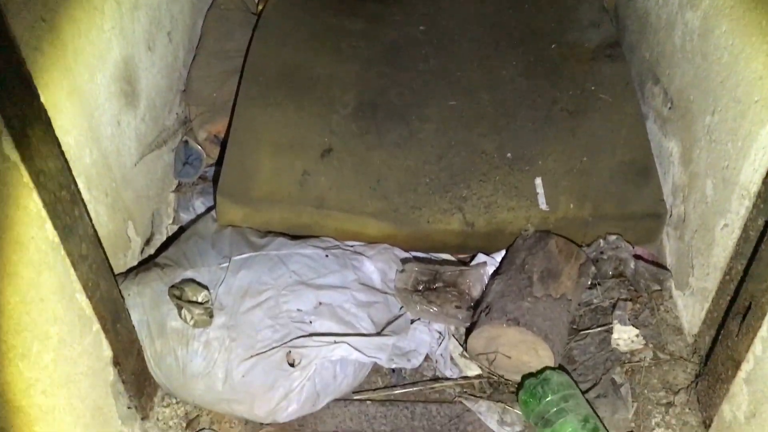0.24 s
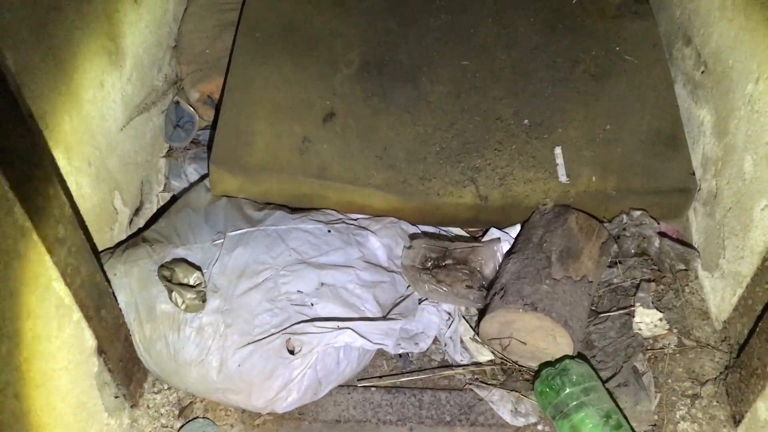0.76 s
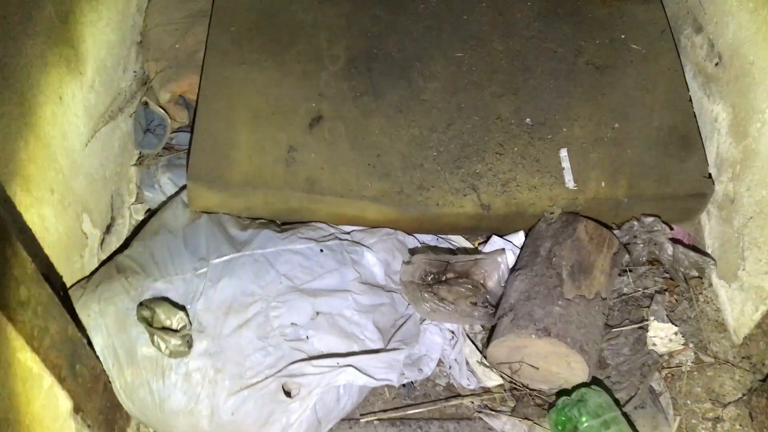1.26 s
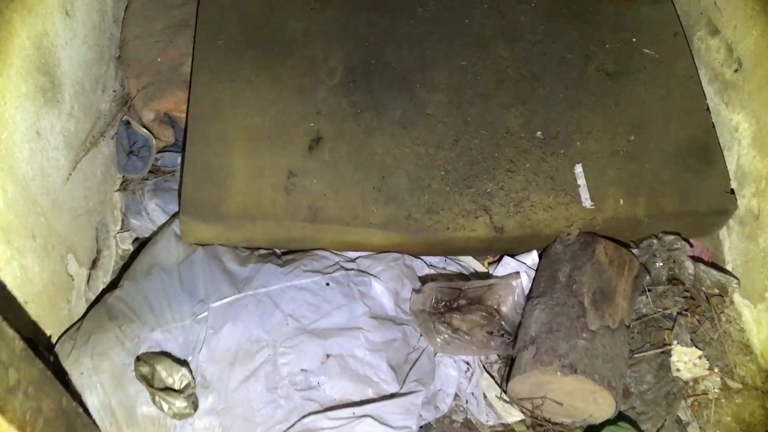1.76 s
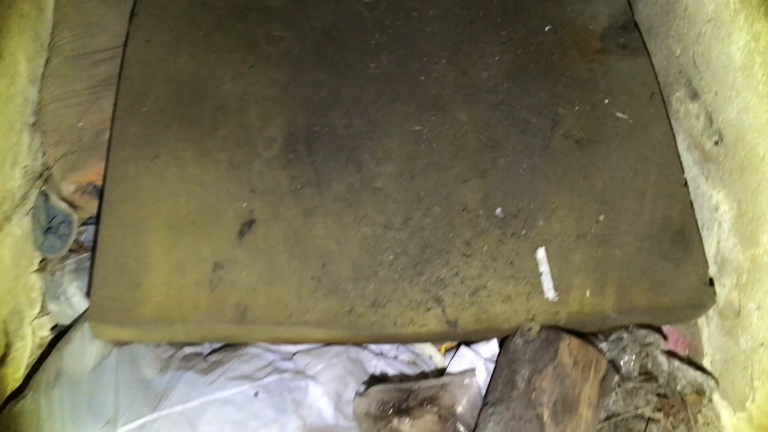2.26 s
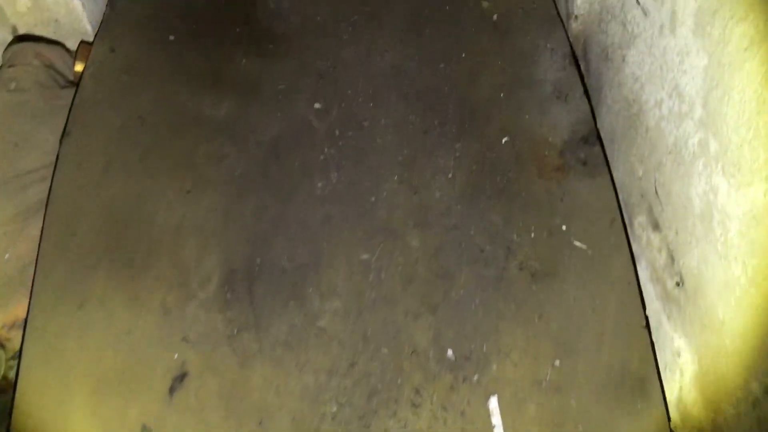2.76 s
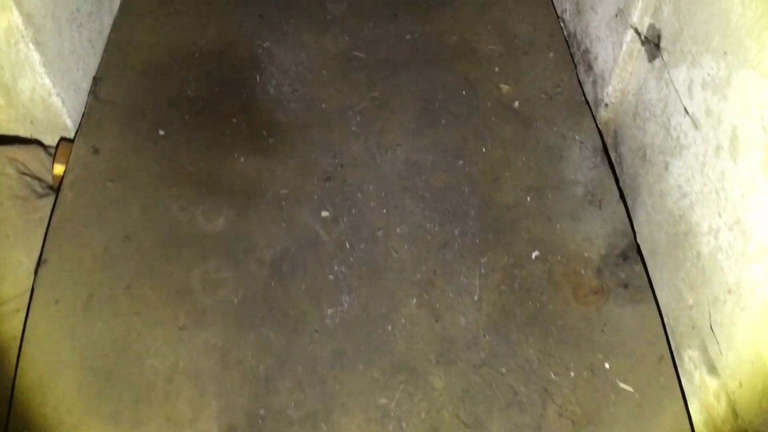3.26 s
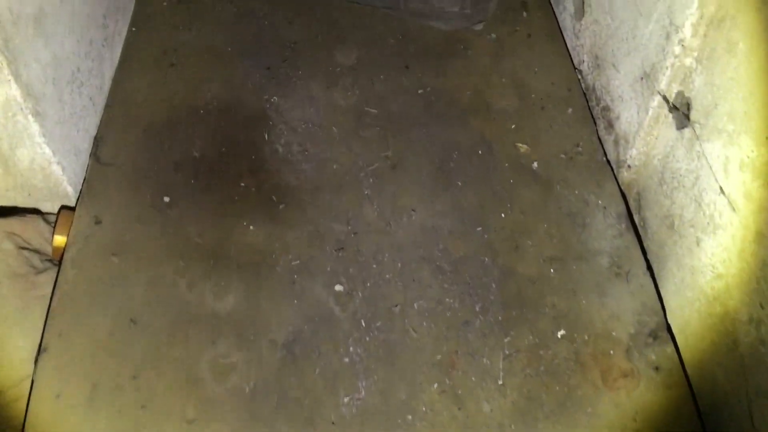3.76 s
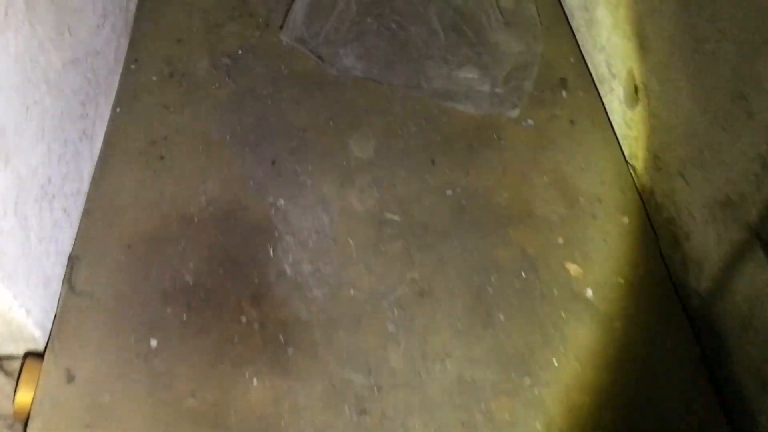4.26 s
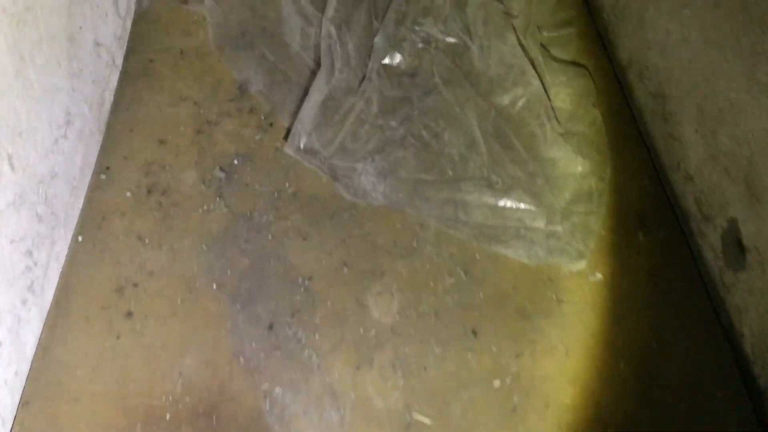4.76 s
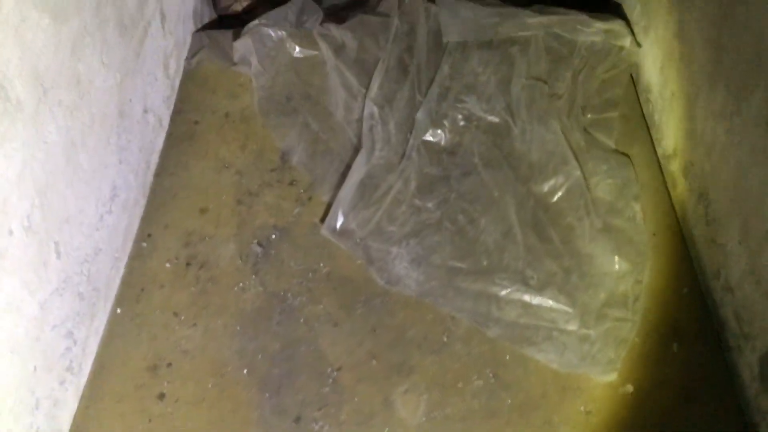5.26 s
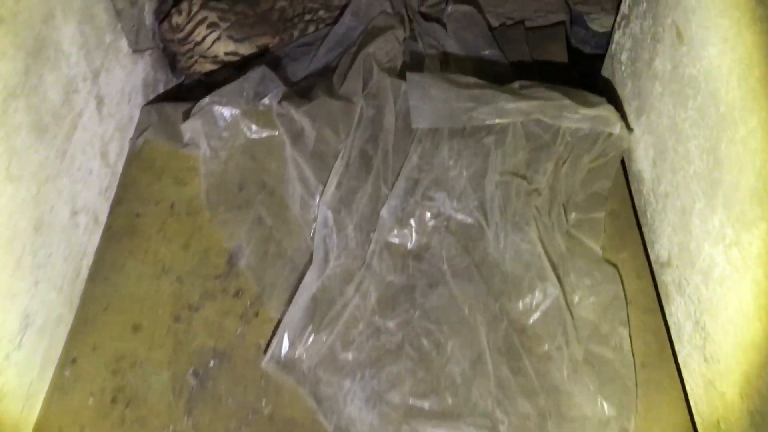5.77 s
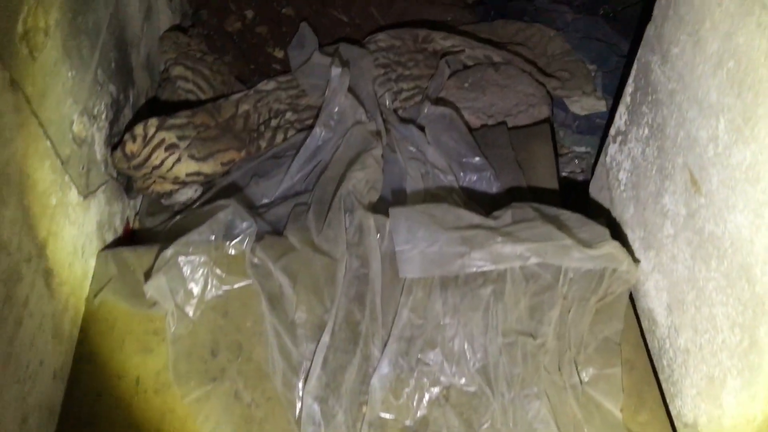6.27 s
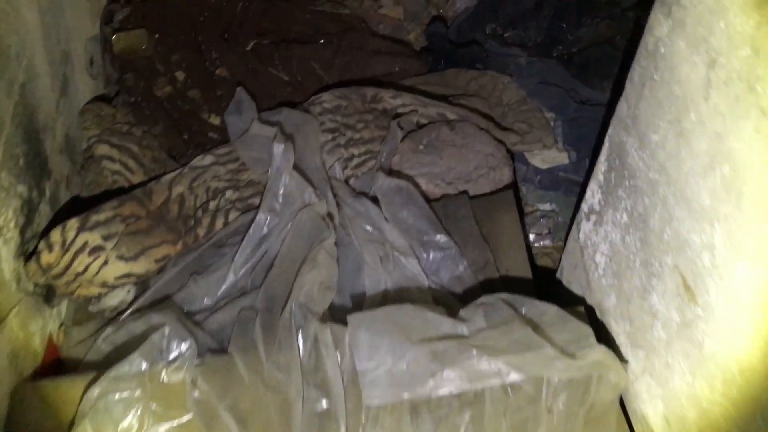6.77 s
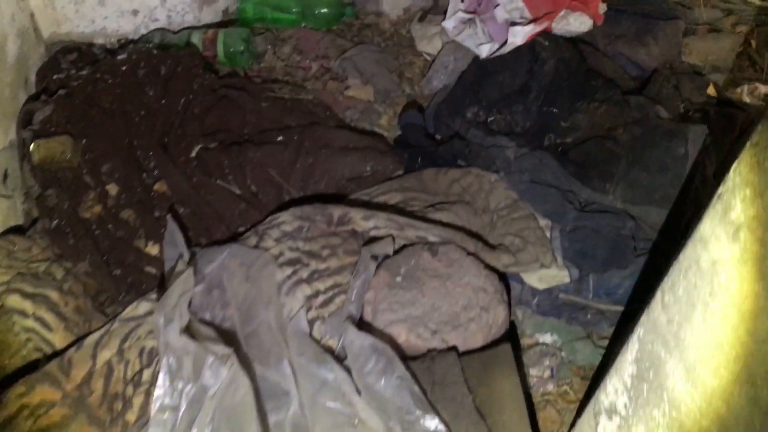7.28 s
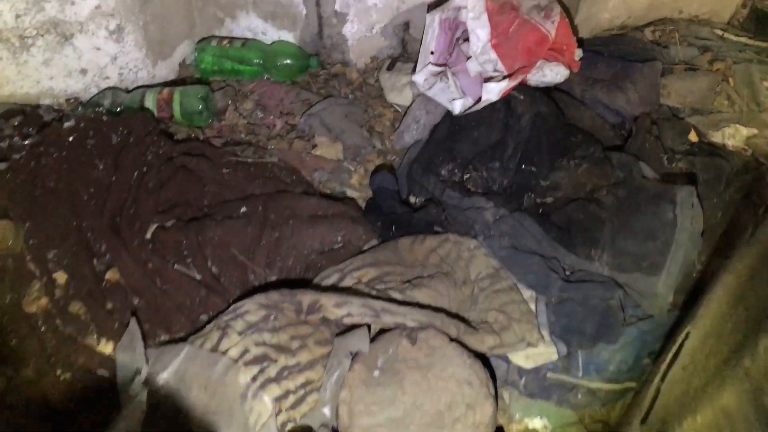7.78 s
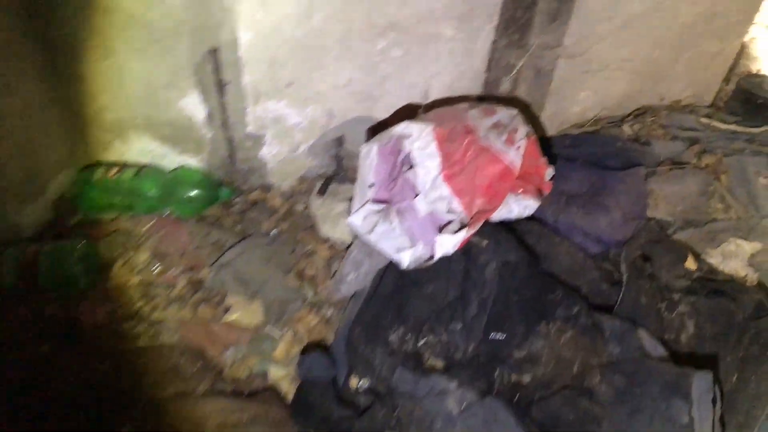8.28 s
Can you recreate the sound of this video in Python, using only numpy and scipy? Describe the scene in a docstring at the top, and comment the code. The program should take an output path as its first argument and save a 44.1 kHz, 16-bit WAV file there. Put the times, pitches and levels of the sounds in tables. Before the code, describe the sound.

Someone creeps over debris with a hand-held camera: faint hiss, low handling rumble, dry crackles, fabric rustle, ending in close rough scraping and thumps.

```python
"""A faint steady hiss over low hand rumble, then grit snaps and crunches underfoot: someone creeps through
a cramped concrete bunker with a hand-held camera, over rubble, a foam mattress and plastic sheet.
A jacket swishes, and cloth and plastic scrape close by: slip noise shaped by limb speed or drag force.
Snaps, crunches and settling bits are band-passed bursts; knocks and camera jolts are damped sines.
Bare walls answer briefly with decaying noise tails and standing waves."""
import sys
import numpy as np
from scipy import signal
from scipy.fft import rfft, irfft, next_fast_len
from scipy.io import wavfile
from scipy.ndimage import uniform_filter1d, map_coordinates

SR = 44100
rng = np.random.default_rng(int(sys.argv[2]) if len(sys.argv) > 2 else 0)


def file_out(sig):
    """Save sig as 16-bit WAV at sys.argv[1]."""
    # one column per channel
    cols = np.atleast_2d(sig).T
    # limit, then scale
    lim = np.clip(cols, -1, 1)
    pcm = np.round(lim * 32767).astype(np.int16)
    wavfile.write(sys.argv[1], SR, pcm)


N = 376173  # samples

# Event levels are relative: layer gains follow.
# faint air hiss spectrum: hz, level_db
AIR_SPECTRUM = [(30, -45), (150, 12), (400, 6), (1000, 6.5), (3000, 0), (5000, -6), (12000, -18),
                (16000, -27)]
# camera body rumble spectrum: hz, level_db
RUMBLE_SPECTRUM = [(10, -35), (20, -6), (33, 1), (41, 0.5), (50, 2.5), (60, -2.5), (75, -9), (100, -20),
                   (140, -33), (300, -64)]
# hand tremor between shifts: time_s, level_db
HAND_TREMOR = [(0, -54.5), (0.7, -48), (2.2, -48), (2.7, -47.5), (6.3, -44.5), (8.5, -46)]
# shifts of the hand holding the camera: start_s, length_s, level_db
HAND_SHIFTS = [(0.64, .34, -42.5), (0.98, 0.59, -40.5), (2.9, 0.73, -43.5), (3.85, .35, -52),
               (4.42, 0.49, -46.5), (5.52, 0.43, -44.5), (6.45, 0.92, -43), (6.8, 0.48, -30.5),
               (7.33, .14, -32), (7.57, 0.29, -39), (7.85, 0.38, -33.5), (8.17, 0.23, -32),
               (8.4, 0.28, -40.5)]
# jolts of the camera: start_s, level_db, pitch_hz, t60_s
CAMERA_JOLTS = [(1.025, -24.5, 44.6, 0.13), (1.102, -37, 109, 0.062), (2.11, -42.5, 71, .2),
                (5.576, -45, 138.4, 0.16), (6.945, -28.5, 105, 0.16), (7.366, -17, 76, 0.053),
                (8.04, -36, 100, 0.21), (8.19, -25.5, 110, 0.13), (8.285, -23, 53.2, 0.34)]
# dull shuffle on foam, spectrum: hz, level_db
SHUFFLE_SPECTRUM = [(60, -4), (110, -4), (175, 5), (240, -6.5), (320, -1.5), (450, -19), (1000, -24)]
# weight settling on the foam mattress: start_s, length_s, level_db
MATTRESS_PRESSES = [(0.98, .2, -86), (3.04, 0.069, -55), (4.15, .14, -65), (4.78, 0.18, -62),
                    (5.66, 0.51, -65), (6.08, 0.33, -58), (6.56, 0.26, -65), (6.8, 0.106, -46.5),
                    (7.45, 0.47, -61), (8.0, 0.18, -45), (8.36, 0.11, -47)]
# sole bumping dully on the mattress: start_s, level_db
SOLE_SCUFFS = [(2.6, -68), (3.068, -58), (4.04, -55), (4.625, -58), (4.692, -57.5), (4.73, -60),
               (7.06, -52)]
# soft jacket rub spectrum: hz, level_db
RUB_SPECTRUM = [(120, -0.5), (280, -3.5), (600, -0.5), (780, -3), (1100, -3), (1500, -1), (3300, -2),
                (5000, -6.5), (9000, -9), (16000, -61)]
# jacket weave hiss spectrum: hz, level_db
NYLON_SPECTRUM = [(1500, -23), (4000, -5), (7000, -2.5), (10000, 0.5), (12500, -0.5), (14500, -2.5),
                  (16000, -8.5)]
# clothes stirring under the swings: time_s, level_db
CLOTHES_STIRRING = [(0.4, -84), (1.0, -76.5), (2.9, -71), (3.6, -66.5), (5.0, -64.5), (5.5, -77),
                    (6.4, -65), (6.8, -63.5)]
# swings of arm or leg in the jacket: start_s, length_s, rub_db, hiss_db
LIMB_SWINGS = [(0.62, 1.0, -71, -84), (1.95, 0.76, -66.5, -74.5), (2.7, 0.11, -64.5, -67),
               (3.08, 0.36, -59.5, -60), (3.47, .25, -64, -80), (3.66, .34, -61, -58),
               (3.97, 0.29, -58.5, -72), (4.27, 0.26, -58, -57), (4.44, .38, -55.5, -59.5),
               (4.73, 0.2, -51.5, -49.5), (4.86, 0.84, -60.5, -79), (5.08, 0.31, -69, -59.5),
               (5.58, 0.18, -67, -71), (5.74, 0.13, -63, -58.5), (5.84, 0.62, -59, -62.5),
               (6.46, 0.25, -62, -58.5)]
# coarse scrape spectrum: hz, level_db
RASP_SPECTRUM = [(70, -17), (100, 10), (135, 4.5), (200, -1), (290, 1), (430, -5.5), (600, -2), (780, -4),
                 (1250, -3.5), (3200, 0.5), (4500, -7), (8000, -11.5), (16000, -47)]
# fine scrape spectrum: hz, level_db
HISS_SPECTRUM = [(800, -59), (2500, -11), (5000, 2.5), (9000, 4.5), (12500, 2), (14500, 0.5), (16000, -17)]
# cloth and plastic dragged close by: start_s, attack_s, hold_s, release_s (1/e), rasp_db, hiss_db
CLOSE_DRAGS = [(2.944, 0.018, .1, 0.069, -50.5, -48), (3.036, 0.023, 0.061, 0.0089, -43, -44),
               (6.804, 0.017, .13, 0.092, -39, -44), (6.872, 0.052, 0.0099, 0.026, -39, -44),
               (7.008, 0.016, 0.069, 0.21, -41.5, -46.5), (7.308, 0.0035, 0.0083, 0.0079, -41, -42),
               (7.326, 0.036, 0.14, 0.15, -49, -57.5), (7.632, 0.25, 0.23, .05, -53.5, -60),
               (7.92, 0.13, 0.022, 0.093, -33, -39.5), (8.16, 0.089, 0.085, 0.084, -43.5, -48),
               (8.333, 0.026, 0.05, 0.12, -43, -45)]
# hollow litter ringing: start_s, level_db, pitch_hz, t60_s
LITTER_KNOCKS = [(0.159, -48.5, 1070, 0.057), (0.182, -58, 676, .1), (0.667, -57.5, 660, 0.14),
                 (0.667, -55, 1020, 0.095), (0.665, -44, 2046, 0.039), (0.665, -42, 3330, 0.033),
                 (0.665, -50, 5350, 0.03), (1.243, -51, 1103, 0.067), (4.935, -41.5, 2040, 0.011),
                 (7.261, -28, 2780, 0.017)]
# rubble giving way under a sole: peak_s, rise_s (1/e), fall_s (1/e), level_db, band_hz
RUBBLE_CRUNCHES = [(0.175, 0.052, 0.031, -58.5, 1420), (0.669, 0.011, .016, -51.5, 2300),
                   (0.674, 0.014, 0.021, -58, 7900), (1.145, 0.045, 0.08, -55.5, 3250),
                   (1.256, 0.014, 0.012, -55, 12000), (1.375, .01, 0.014, -66, 6500),
                   (2.004, 0.0027, 0.041, -56.5, 1960), (2.005, .005, 0.049, -57, 7500),
                   (2.205, 0.014, 0.026, -58, 1890), (2.31, .0015, 0.033, -44.5, 1710),
                   (2.373, 0.044, 0.039, -50, 4080), (2.47, 0.0086, 0.014, -54, 2480),
                   (2.775, 0.017, 0.011, -57.5, 1570), (3.069, 0.011, 0.019, -45, 1080),
                   (3.165, 0.0036, 0.017, -47, 4970), (3.602, 0.0036, 0.0088, -55.5, 1370),
                   (4.043, .002, 0.025, -53.5, 1810), (4.099, 0.0016, .008, -46, 5400),
                   (4.835, 0.015, 0.013, -47.5, 3000), (6.835, 0.01, 0.035, -42.5, 1090),
                   (7.04, 0.022, 0.019, -41, 1310), (7.315, 0.0026, 0.0068, -41, 10000),
                   (8.02, 0.026, 0.043, -46, 2500), (8.385, 0.031, 0.062, -44.5, 1500)]
# grit and plastic creases snapping: start_s, body_db, edge_db
GRIT_SNAPS = [(0.159, -51, -72), (0.18, -48, -70), (0.666, -44, -51), (0.89, -47.5, -60), (0.949, -50, -70),
              (1.133, -31, -51), (1.193, -39, -56), (1.36, -41.5, -60), (1.8, -50.5, -62.5),
              (1.999, -41.5, -48), (2.185, -45, -65), (2.261, -44, -62), (2.309, -61, -64),
              (2.465, -34.5, -51), (2.894, -49.5, -58), (3.602, -43.5, -54), (3.999, -43, -47.5),
              (4.039, -33.5, -40), (4.097, -39, -70), (4.907, -41, -42), (6.959, -27.5, -51),
              (7.032, -33, -39), (7.085, -37, -39), (7.138, -39, -40), (7.224, -34, -57), (7.261, -32, -40),
              (7.311, -38, -38), (7.424, -36, -42), (7.564, -35, -42), (7.91, -36, -38.5),
              (8.155, -36, -35), (8.376, -37, -36.5)]
# decay of the walls: hz, t60_s
WALL_DECAY = [(200, 0.57), (2000, 0.25), (6000, 0.13), (14000, 0.25)]
# standing waves between close walls: centre_hz, width_hz, level_db
STANDING_WAVES = [(178, 20, -0.5), (294.4, 14, -3), (585, 62, -7.5), (927, 210, -11), (1210, 140, -5.5)]
# microphone port ripple: hz, level_db
PORT_RIPPLE = [(2500, -0.5), (3400, 1), (3800, -1.5), (4800, -2.5), (6600, 1), (7700, -3.5), (9200, 0.5),
               (10400, -3), (11700, 3), (14000, -1)]
TOP_HZ = 15900  # band limit


def amp(db):
    """Decibels to gain."""
    return 10 ** (np.asarray(db) / 20)


def unit(x):
    """Scale to rms 1."""
    return x / np.sqrt(np.mean(x ** 2) + 1e-20)


def along(points, hz):
    """Interpolate (hz, value) points on a log frequency axis."""
    f, v = np.transpose(points)
    return np.interp(np.log(hz + 1), np.log(f + 1), v)


def curve(rows):
    """Interpolate (time_s, level_db) points to one gain per sample."""
    s, db = np.transpose(rows)
    return amp(np.interp(np.arange(N) / SR, s, db))


def wobble(rate_hz):
    """Smooth random curve with rate_hz knots per second."""
    knots = rng.standard_normal(int(N * rate_hz / SR) + 4)
    return map_coordinates(knots, [np.arange(N) * rate_hz / SR])


def filtered(x, response):
    """Multiply the spectrum of x by a function of frequency."""
    m = next_fast_len(N + SR // 2)
    spectrum = rfft(x, m) * response(np.fft.rfftfreq(m, 1 / SR))
    return irfft(spectrum, m)[:N]


def coloured(x, spectrum):
    """Filter x by a spectrum table, then scale to rms 1."""
    return unit(filtered(x, lambda hz: amp(along(spectrum, hz))))


def resonate(x, centre_hz, spread, low_hz):
    """Broad causal band around centre_hz; small pieces radiate little below low_hz."""
    edges_hz = np.clip([centre_hz / (1 + spread), centre_hz * (1 + spread)], 50, [SR / 3, SR / 2.2])
    band = signal.butter(2, edges_hz, 'band', fs=SR, output='sos')
    highpass = signal.butter(2, low_hz, 'high', fs=SR, output='sos')
    return signal.sosfilt(highpass, signal.sosfilt(band, x))


def grains(rate_hz, scatter_db):
    """Tiny slips at random moments with clipped log-normal sizes, rms 1."""
    happen = rng.random(N) < rate_hz / SR
    sign = rng.choice([-1, 1], N)
    size = amp(scatter_db * np.clip(rng.standard_normal(N), -2, 2))
    return unit(happen * sign * size)


def crackle(rate_hz, pitch_hz, scatter, decay_cycles, size_db):
    """Creases buckle at random, each ringing briefly at its own pitch; rms 1."""
    draws = np.clip(rng.standard_normal((int(rate_hz * N / SR), 2)), -2, 2)
    t = np.arange(SR // 80) / SR
    pitch = pitch_hz * np.exp(scatter * draws[:, :1])
    decay = np.exp(-pitch * t / decay_cycles)
    pops = amp(size_db * draws[:, 1:]) * np.sin(2 * np.pi * pitch * t) * decay
    at = rng.integers(0, N, (len(draws), 1)) + np.arange(len(t))
    return unit(np.bincount(at.ravel(), pops.ravel(), N)[:N])


def add(track, start_s, sound):
    """Mix sound into track at start_s."""
    start = max(round(start_s * SR), 0)
    track[start:start + len(sound)] += sound[:max(N - start, 0)]


def rings(table, attack_s, rough):
    """One damped resonance per row; loose contact makes its phase wander."""
    out, t = np.zeros(N), np.arange(SR // 3) / SR
    for s, db, hz, t60_s in table:
        wander = rough * np.cumsum(rng.standard_normal(len(t))) * np.sqrt(hz / SR)
        onset = 1 - np.exp(-t / attack_s)
        tone = np.sin(2 * np.pi * hz * t + wander)
        add(out, s, amp(db - 60 * t / t60_s) * tone * onset)
    return out


def swings(rows, sharpness):
    """Loudness follows limb speed, a half sine; one gain track per dB column."""
    power = np.zeros((len(rows[0]) - 2, N))
    for s, length_s, *levels_db in rows:
        speed = np.abs(np.sin(np.linspace(0, np.pi, round(length_s * SR))))
        for track, db in zip(power, levels_db):
            add(track, s, (amp(db) * speed ** sharpness) ** 2)
    return np.sqrt(power)


def drags():
    """Drag force builds, holds and dies away; gains of rasp and hiss."""
    power, t = np.zeros((2, N)), np.arange(SR) / SR
    for s, attack_s, hold_s, release_s, *levels_db in CLOSE_DRAGS:
        fade = np.exp(-np.maximum(t - attack_s - hold_s, 0) / release_s)
        force = np.minimum(t / attack_s, 1) * fade
        for track, db in zip(power, levels_db):
            add(track, s, (amp(db) * force) ** 2)
    return np.sqrt(power)


def air_hiss(level_db=-70):
    """Steady coloured noise."""
    return amp(level_db) * coloured(rng.standard_normal(N), AIR_SPECTRUM)


def handling(rumble_db=-1.0, steadiness=1.0):
    """The grip shakes the camera body fairly evenly, more when it shifts, with an occasional jolt."""
    shake = coloured(rng.standard_normal(N), RUMBLE_SPECTRUM)
    local_power = np.abs(uniform_filter1d(shake ** 2, SR // 12))
    shake = unit(shake / local_power ** (steadiness / 2))
    shift, = swings(HAND_SHIFTS, sharpness=0.61)
    rumble = amp(rumble_db) * np.hypot(shift, curve(HAND_TREMOR)) * shake
    return rumble + rings(CAMERA_JOLTS, attack_s=0.0038, rough=0.05)


def shuffle(rub, rasp, rub_db=-11, rasp_db=-13, press_db=0.0, rest_db=-76):
    """Limbs shuffle dully on the foam with every swing, drag and settling of weight."""
    press, = swings(MATTRESS_PRESSES, sharpness=0.75)
    power = (amp(rub_db) * rub) ** 2 + (amp(rasp_db) * rasp) ** 2
    power += (amp(press_db) * press) ** 2 + amp(rest_db) ** 2
    return np.sqrt(power) * coloured(rng.standard_normal(N), SHUFFLE_SPECTRUM)


def scuffs(level_db=0.0, band_hz=560, spread=0.35, low_hz=300, fall_s=0.014):
    """Each bump is a short noise burst in one hollow resonance of the padded floor."""
    out, t = np.zeros(N), np.arange(SR // 8) / SR
    for s, db in SOLE_SCUFFS:
        burst = rng.standard_normal(len(t)) * np.exp(-t / fall_s)
        bump = resonate(burst, band_hz, spread, low_hz)
        add(out, s, amp(db + level_db) * bump / np.std(bump[:SR // 50]))
    return out


def jacket(rub, hiss, rub_db=0.0, hiss_db=1, stir_db=-1, stir_hiss_db=-2, catch_db=1.6, crinkle_db=-14):
    """Fine weave slides on itself: very dense slips, catching slightly, with a few crinkles."""
    stir = curve(CLOTHES_STIRRING)
    rub = np.hypot(rub, amp(stir_db) * stir)
    hiss = np.hypot(hiss, amp(stir_hiss_db) * stir)
    slips = grains(rate_hz=6000, scatter_db=3.0) * amp(catch_db * wobble(45))
    soft = amp(rub_db) * coloured(slips, RUB_SPECTRUM)
    crinkles = crackle(rate_hz=140, pitch_hz=3400, scatter=0.41, decay_cycles=1.3, size_db=4.5)
    weave = coloured(grains(rate_hz=16000, scatter_db=8), NYLON_SPECTRUM)
    return rub * (soft + amp(crinkle_db) * crinkles) + amp(hiss_db) * hiss * weave


def scrapes(rasp, hiss, rasp_db=-2, hiss_db=0.0, crackle_db=-7.5, tick_db=-9.0, catch_db=1.26, lurch_db=0.67):
    """Pressed fabric sticks and slips in coarser clumps; the plastic crackles and ticks."""
    catching = amp(catch_db * wobble(110) + lurch_db * wobble(35))
    coarse = coloured(grains(rate_hz=5500, scatter_db=2.0) * catching, RASP_SPECTRUM)
    fine = coloured(grains(rate_hz=14000, scatter_db=7.5) * catching, HISS_SPECTRUM)
    creases = crackle(rate_hz=230, pitch_hz=2610, scatter=0.275, decay_cycles=3.6, size_db=4.0)
    ticks = crackle(rate_hz=84, pitch_hz=11200, scatter=0.22, decay_cycles=2, size_db=6)
    low = rasp * (amp(rasp_db) * coarse + amp(crackle_db) * creases)
    high = hiss * (amp(hiss_db) * fine + amp(tick_db) * ticks)
    return low + high


def settling(level_db=-6, wait_s=0.04, loss_db_per_s=90, scatter_db=3, band_hz=2900, spread=1.3,
             low_hz=900, t60_s=0.006, count=5):
    """From each crunch peak onward, loose bits tick into place, weaker on average the later they come."""
    out, t = np.zeros(N), np.arange(SR // 50) / SR
    for s, _, _, db, _ in RUBBLE_CRUNCHES:
        delays_s = wait_s * rng.exponential(size=count)
        sizes = np.clip(rng.standard_normal(count), -1, 1)
        for late_s, size in zip(delays_s, sizes):
            burst = rng.standard_normal(len(t)) * amp(-60 * t / t60_s)
            tick = resonate(burst, band_hz, spread, low_hz)
            tick_db = db + level_db + scatter_db * size - loss_db_per_s * late_s
            add(out, s + late_s, amp(tick_db) * tick / np.std(tick[:SR // 500]))
    return out


def knocks():
    """Hollow litter rings with quick, rough damped resonances."""
    return rings(LITTER_KNOCKS, attack_s=0.00035, rough=0.51)


def crunches(level_db=-1, spread=1.06, low_hz=550):
    """A shower of tiny breaks builds as the weight comes on, then thins out."""
    out, t = np.zeros(N), np.arange(-(SR // 4), SR // 4) / SR
    grit = grains(rate_hz=2300, scatter_db=7.5)
    for s, rise_s, fall_s, db, hz in RUBBLE_CRUNCHES:
        piece = np.roll(grit, -round(s * SR))[:len(t)]
        shower = unit(resonate(piece, hz, spread, low_hz))
        shower *= amp(db + level_db) * np.exp(np.minimum(t / rise_s, -t / fall_s))
        early = max(-round((s + t[0]) * SR), 0)  # samples before time zero
        add(out, s + t[0], shower[early:])
    return out


def snaps(body_gain_db=-7, edge_gain_db=1.8, body_hz=2250, edge_hz=7000, t60_s=0.011, spread=1.33,
          edge_spread=0.72, low_hz=650):
    """Each break is a very short noise crack: a woody body and a bright edge."""
    out, t = np.zeros(N), np.arange(SR // 30) / SR
    for s, body_db, edge_db in GRIT_SNAPS:
        burst = rng.choice([-1, 1], len(t)) * amp(-60 * t / t60_s)
        body = resonate(burst, body_hz, spread, low_hz)
        edge = resonate(burst, edge_hz, edge_spread, low_hz)
        for db, crack in (body_db + body_gain_db, body), (edge_db + edge_gain_db, edge):
            add(out, s, amp(db) * crack / np.std(crack[:SR // 500]))
    return out


def bunker(far, near, near_db=-5, wet_db=-5, gap_s=0.002, count=18):
    """Walls answer floor more than clothes, with a new tail per stretch of time; decay varies with frequency."""
    noise = rng.standard_normal((count, SR // 3))
    hz, t, z = signal.stft(noise, SR, nperseg=256)
    decay = amp(-60 * t / along(WALL_DECAY, hz)[:, None])
    tails = signal.istft(z * decay, SR, nperseg=256)[1]
    tails *= 1 - np.exp(-(np.arange(tails.shape[1]) / SR / gap_s) ** 2)
    sent, echo, stretch = far + amp(near_db) * near, np.zeros(N), N // count + 1
    for k, tail in enumerate(tails):
        part = sent[k * stretch:(k + 1) * stretch]
        add(echo, k * stretch / SR, signal.fftconvolve(part, tail / np.linalg.norm(tail)))

    def modes(f):
        """Direct path plus one resonance per standing wave."""
        return 1 + sum(amp(db) * 1j * f * w / (c * c - f * f + 1j * f * w) for c, w, db in STANDING_WAVES)

    return filtered(far + near + amp(wet_db) * echo, modes)


def scene():
    """Debris and clothing in the room, over foam noises, camera rumble and faint hiss."""
    rub, swish = swings(LIMB_SWINGS, sharpness=0.82)
    rasp, hiss = drags()
    background = air_hiss() + handling() + shuffle(rub, rasp) + scuffs()
    cloth = jacket(rub, swish) + scrapes(rasp, hiss)
    debris = settling() + knocks() + crunches() + snaps()
    return (background + bunker(debris, cloth))[None]


def record(dry):
    """The microphone port ripples the treble; nothing passes above the band limit."""
    return filtered(dry[0], lambda hz: amp(along(PORT_RIPPLE, hz)) * (hz < TOP_HZ))[None]


dry = scene()
out = record(dry)
file_out(out)
```